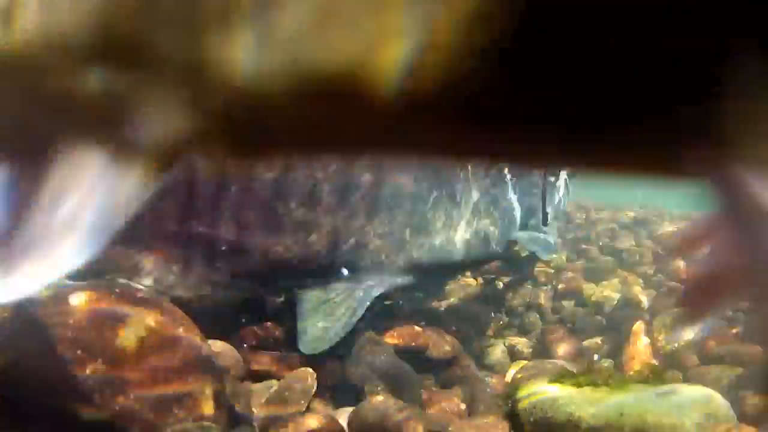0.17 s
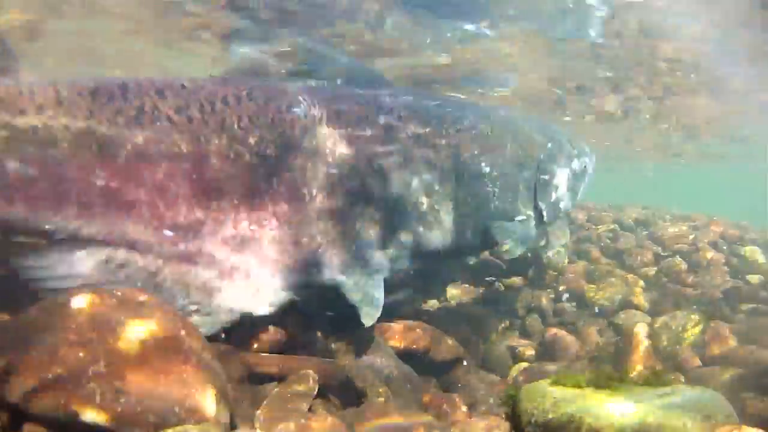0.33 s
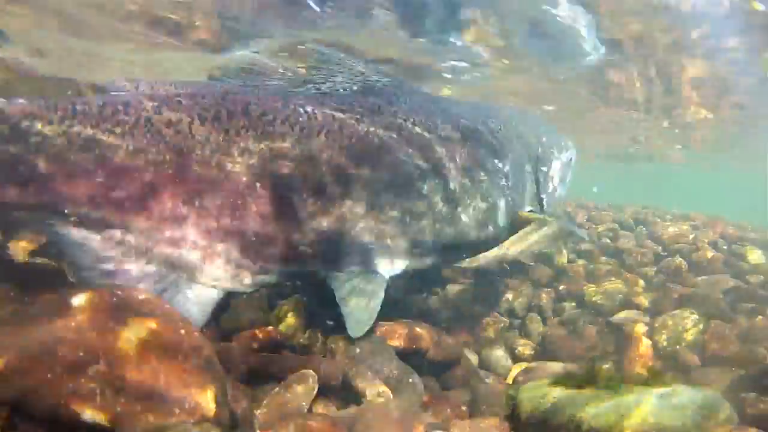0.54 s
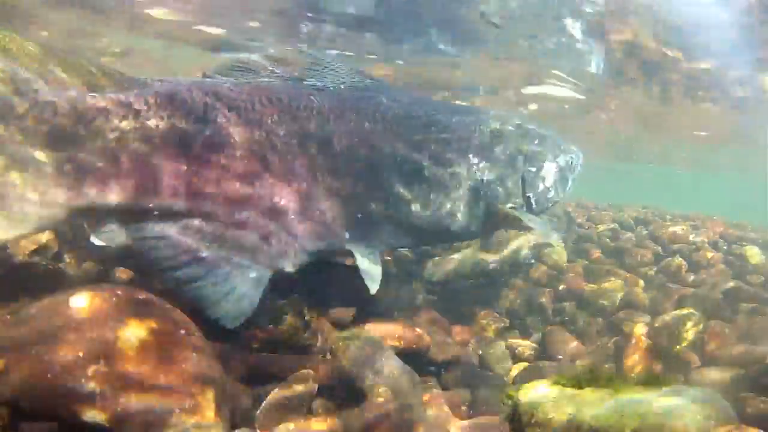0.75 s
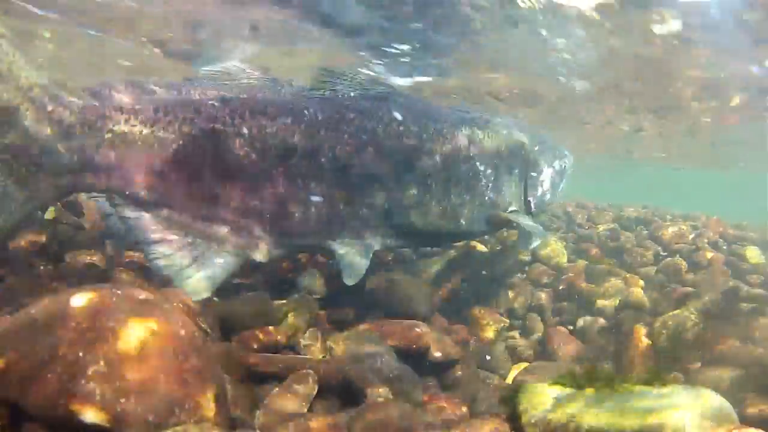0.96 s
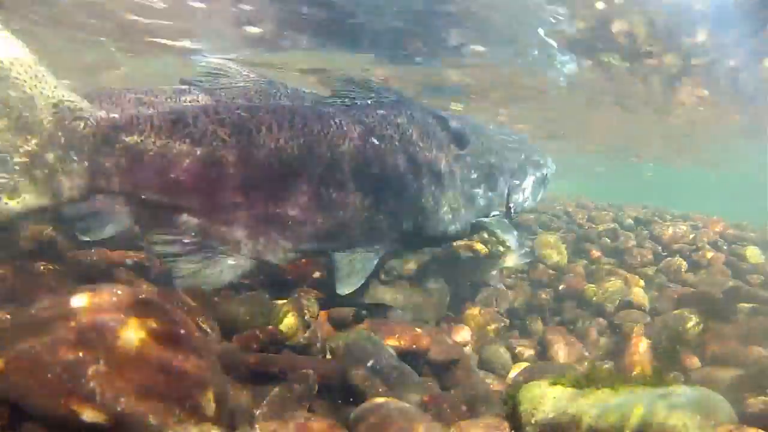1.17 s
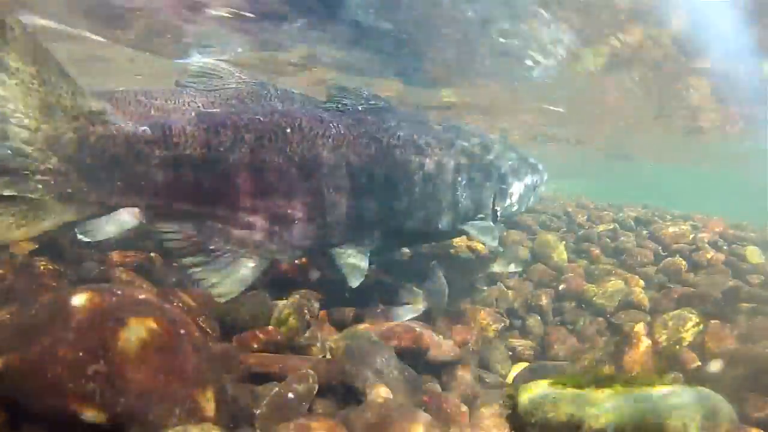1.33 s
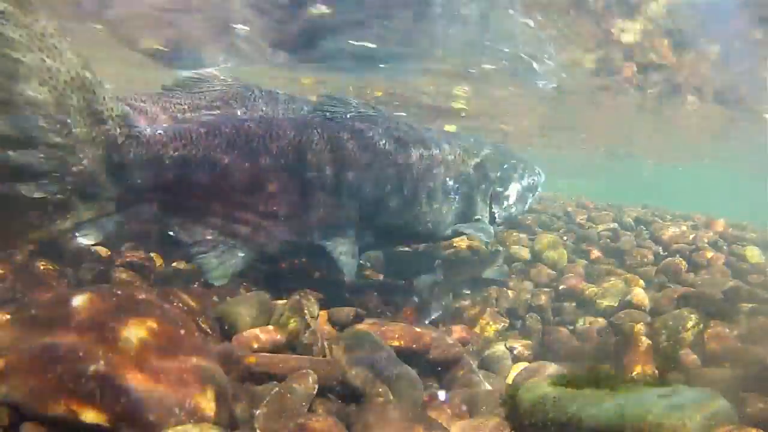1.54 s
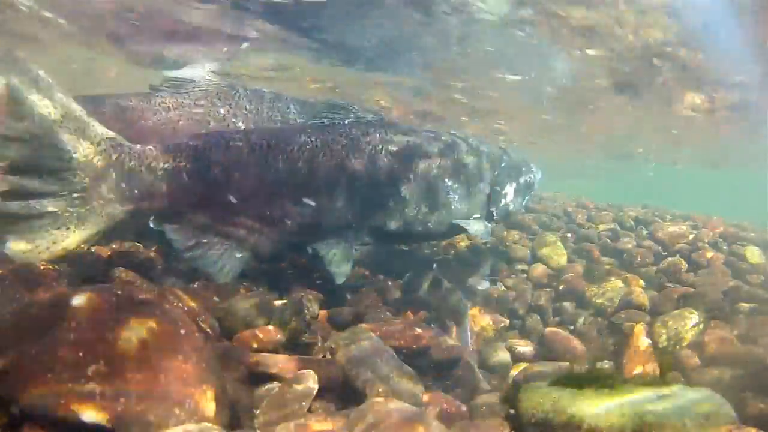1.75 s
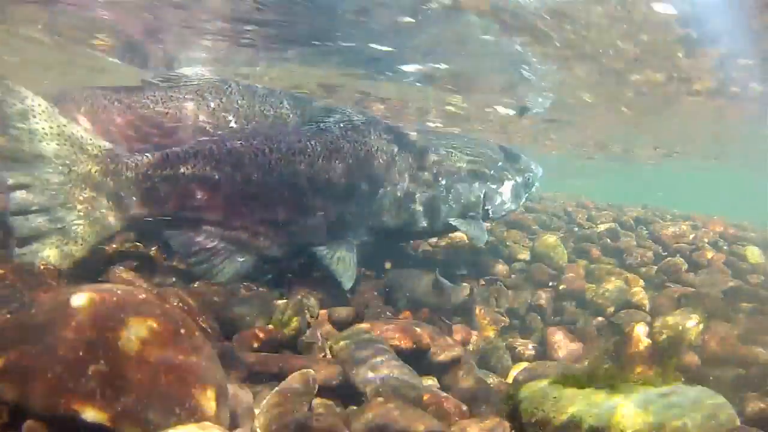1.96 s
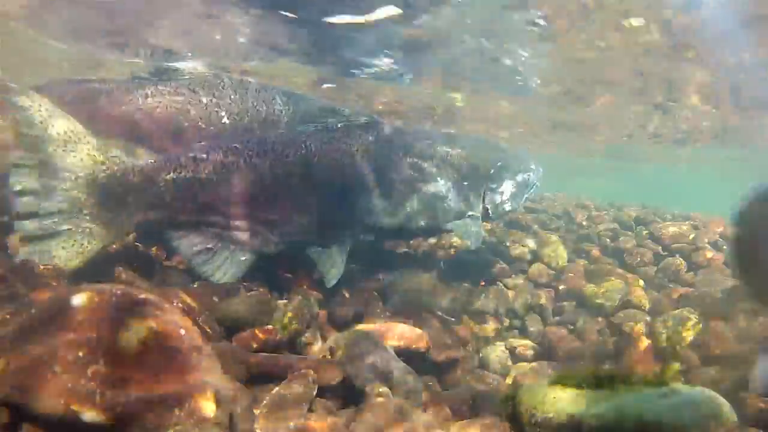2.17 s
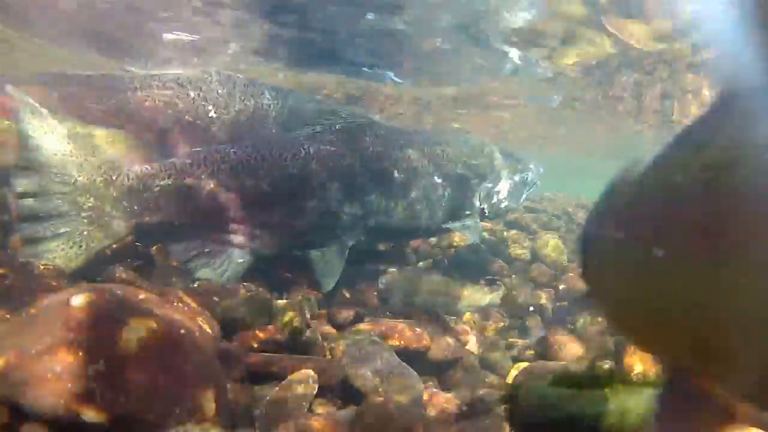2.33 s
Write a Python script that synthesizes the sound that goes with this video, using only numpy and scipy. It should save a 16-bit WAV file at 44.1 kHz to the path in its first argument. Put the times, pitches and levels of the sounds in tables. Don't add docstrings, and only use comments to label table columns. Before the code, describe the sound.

Fish shove a small underwater case with heavy muffled thuds and a gravel crack, over faint stream gurgle.

```python
import sys
import numpy as np
from scipy import signal
from scipy.fft import rfft, irfft, next_fast_len
from scipy.io import wavfile
from scipy.ndimage import map_coordinates

SR = 44100
rng = np.random.default_rng(int(sys.argv[2]) if len(sys.argv) > 2 else 0)


def dump(signal):
    limited = np.clip(np.atleast_2d(signal).T, -1, 1)
    pcm = np.round(limited * 32767).astype(np.int16)
    wavfile.write(sys.argv[1], SR, pcm)


def attenuation_scalar(level_db):
    decades = np.asarray(level_db, float) / 20
    return 10 ** decades


N = 105840

# [t/s, level/dB]
STIR = [(0, -37.5), (.1, -31.5), (.26, -37.5), (0.411, -36.5), (.55, -39.5), (.75, -33.5), (.88, -42),
        (1.02, -43), (1.199, -42), (1.362, -46), (1.439, -53.5), (1.62, -45.5), (1.779, -35.5),
        (1.878, -44.5), (1.96, -42), (2.19, -26.5), (2.28, -44), (2.4, -35.5)]
# [f/Hz, level/dB]
WASH = [(15, -55), (25, -29), (98, 3), (138, -11), (198, -4.5), (310, -16), (366, -23.5), (900, -34.5),
        (1170, -71.5), (1980, -120)]
# [f/Hz, level/dB]
RUMBLE = [(12, -6), (30, 5.5), (55, 3.5), (90, -20)]
# [f/Hz, width/Hz, level/dB]
CASE_RINGS = [
    (1035, 210, 5),
    (2290, 59, 2.5),
    (2750, 200, -14.5),
    (3400, 120, 3),
]
# [t/s, peak level/dB, f/Hz, time to fall 60 dB/s]
TICKS = [(0.0064, -27.5, 2320, 0.032), (0.0374, -38.5, 2420, 0.043), (0.238, -39.5, 2290, 0.024),
         (0.392, -24.5, 3390, 0.042), (0.411, -15, 2890, 0.018), (0.4349, -19, 2820, 0.018),
         (0.447, -23, 2270, 0.04), (0.4966, -40, 2190, 0.019), (0.5212, -47, 2150, 0.0797),
         (0.5412, -40.5, 3363, 0.036), (0.622, -33, 2520, 0.036), (0.646, -40.5, 2370, 0.053),
         (0.6689, -32.5, 2470, 0.012), (0.6958, -39.5, 2450, 0.018), (0.7108, -26, 2620, 0.014),
         (0.722, -29, 2590, 0.051), (0.7994, -41, 2560, 0.036), (0.825, -33, 2430, 0.014),
         (0.845, -40, 2490, 0.015), (0.8656, -45, 3400, 0.021), (0.9094, -43, 2270, 0.028),
         (0.9645, -39, 2240, 0.031), (1.045, -45, 3420, 0.026), (1.125, -44.5, 2214, 0.024),
         (1.1954, -39, 2303, 0.049), (1.3526, -48, 3400, 0.04), (1.455, -48.5, 2850, 0.028),
         (1.517, -49.5, 3540, 0.024), (1.6123, -43, 2440, 0.01), (1.6666, -56.5, 3440, 0.1011),
         (.303, -9, 2237, 0.035), (0.18, -33, 2225, 0.037), (0.602, -50, 2660, 0.022),
         (.922, -46.5, 2330, .04), (.938, -53, 2200, 0.023), (.953, -49, 2080, 0.029)]
# [t/s, level/dB, length/s, top f/Hz]
BUMPS = [(0.04, -33, 0.015, 500), (0.081, -41, 0.1, 463), (0.114, -18.5, 0.012, 803),
         (0.135, -25.5, 0.011, 600), (.195, -31.5, .01, 1010), (0.643, -55, 0.014, 480),
         (0.77, -42.5, 0.052, 600), (0.903, -46, 0.043, 740), (1.634, -34, 0.0043, 865),
         (1.682, -42, 0.034, 800), (1.696, -41.5, .008, 1290), (1.756, -44.5, 0.064, 625),
         (1.892, -53, 0.0078, 900), (1.907, -31.5, 0.0048, 1250), (1.917, -36.5, 0.0074, 910),
         (2.014, -35.5, 0.028, 785), (2.104, -25, 0.028, 646.6), (2.136, -33, 0.013, 624),
         (2.196, -35, 0.017, 780), (2.29, -34, 0.012, 686), (2.349, -33, 0.0044, 833),
         (2.359, -39, 0.0093, 670)]
# [t of crest/s, level/dB, f/Hz, length/cycles]
SHOVES = [(0.084, -19.5, 252, 1.17), (.129, 8.5, 78.4, 0.39), (.168, -5, 60.6, 0.33),
          (0.188, -11, 66.4, 0.37), (.198, -17, 70, 0.28), (0.211, -13, 131, 0.48), (.29, -15.5, 90, 0.38),
          (0.302, -0.5, 39.6, 0.15), (.335, -10.5, 150, 0.43), (.3395, -6.5, 150, .4),
          (0.348, -11.5, 124, 0.76), (0.3597, -2, 174.3, 0.49), (0.37, -11, 103, 0.47),
          (.386, -17, 108, 0.67), (.585, -21.5, 178, 0.43), (0.742, -22.5, 200, 0.34),
          (0.803, -35, 150, 1.1), (.868, -34, 186, 1.9), (.483, -27, 150, 0.7), (1.692, -24, 205, 1.42),
          (1.778, -26.5, 130, 0.72), (1.797, -27, 168, 1.83), (1.931, -26.5, 195, 1.05),
          (2.021, -20, 69, 0.82), (2.095, -11, 87, 0.46), (2.1131, -3, 97, 0.8), (2.112, -0.5, 192, 0.79),
          (2.129, -13.5, 112, 0.41), (0.248, -27.5, 32, 0.74), (2.14, -11.5, 114.6, 0.51),
          (2.151, -17.5, 150, 0.69), (2.157, -13.5, 198, 0.78)]
# [t of trough/s, level/dB, f/Hz, length/cycles]
PULLS = [(.1185, -1, 40, 0.15), (.139, -3.5, 30, 0.12), (.177, -8.5, 30, 0.12), (.2955, -1.5, 40, 0.059),
         (.315, -6.5, 100, 0.13), (.331, -10.5, 110, 0.51), (.343, -16.5, 130, 0.24),
         (.356, -12.5, 60, 0.43), (.793, -26, 150, .6), (2.146, -11.5, 80, .3), (2.29, -19.5, 200, 0.47)]
# [t/s, length/s, level/dB, tilt/dB
SCRAPES = [(0.113, 0.017, -26, -6.5), (0.176, 0.013, -35, -9), (0.285, 0.018, -20.5, -3.5),
           (0.2934, 0.0065, -12, -1.5), (0.3, 0.005, -9.5, -1), (1.654, 1, -71, 26),
           (0.154, 0.021, -40.5, -13), (0.34, 0.0012, -19, -7), (.347, 0.022, -28, -13.5),
           (0.536, 0.0044, -44, -5), (0.716, 0.016, -44.5, -1), (0.919, 0.029, -53, -8),
           (0.19, 0.0067, -34.5, -9), (0.372, 0.0065, -41.5, -14), (2.014, 0.015, -41, -3.5),
           (2.102, 0.0049, -27, 4), (2.126, 0.0044, -34, -6.5)]
# [t/s, peak level/dB, brightest f/Hz]
CLICKS = [(0.2958, -6, 1694), (0.2963, -2, 2220), (0.3412, -32, 2210), (0.5376, -39.5, 3390),
          (0.5687, -48, 3390), (0.8961, -52.5, 2180), (0.9207, -44, 2440), (0.9652, -39.5, 2100),
          (1.0946, -47.5, 2300), (1.2534, -60.5, 2730), (1.328, -52.5, 3480), (1.3534, -44.5, 3400),
          (1.6368, -50, 2060), (1.6672, -46, 3290), (1.7504, -58, 2350), (1.7544, -54.5, 3520),
          (1.8092, -32.5, 3370), (1.851, -29, 2050), (1.8666, -26, 3500), (1.8951, -47, 3420),
          (1.9094, -45, 2380), (1.932, -44, 3440), (1.949, -47, 3470), (1.9778, -41.5, 3350),
          (1.9899, -38, 3460), (2.0047, -38.5, 2960), (2.0514, -37.5, 2140), (2.1021, -27.5, 2750),
          (2.155, -38, 3120), (2.1654, -44, 3430), (2.1802, -50, 3470), (2.1982, -46, 1750),
          (2.2268, -58, 2350), (2.2586, -50, 3470), (2.2804, -56, 3460), (2.3457, -51.5, 3220),
          (2.3503, -52.5, 2690)]
# [t/s, level/dB, f/Hz, time to fall 60 dB/s]
BUBBLES = [
    (.722, -31, 1010, 0.065),
    (0.9648, -40, 1560, 0.04),
    (.966, -42, 3360, .025),
    (.728, -37, 2650, 0.03),
    (0.788, -47, 1000, 0.02),
]

EDDY_RATE, EDDY_HZ, EDDY_SPREAD, EDDY_CYCLES, EDDY_SIZE_DB = 130, 150, 0.34, 2.59, 5.5
EDDY_DB, WASH_DB, RUMBLE_DB = 0, -2.5, -12.5
RUMBLE_GROWS, HISS_GROWS = 0.53, 0.47
HISS_DB, HISS_FLAT = -63.5, 0.96
PATTER_RATE, PATTER_DB, PATTER_SIZE_DB, PATTER_SCATTER, PATTER_T60_S = 56, -5.5, 6.5, 0.1, 0.025
TICK_ROUGH, TICK_ROUGH_S = 1, 0.0024
TICK_CRACK, CRACK_T60_S = 0.37, 0.012
BUMP_KICK, BUMP_T60_S, BUMP_LOW_HZ = 1.74, 0.033, 150
SHOVE_TAIL = 1.187
SCRAPE_RISE_S, SCRAPE_T60_S, SCRAPE_GRIT_DB = 0.0031, 0.0082, 6
SCRAPE_TAIL = 3.44
CLICK_DB, CLICK_RISE_S, CLICK_HOLD_S, CLICK_T60_S = -4.5, 0.00068, 0.0017, 0.02
CLICK_LOW_HZ, CLICK_WIDTH_HZ, CLICK_PEAK = 1157, 800, 0.8
BUBBLE_SAG, BUBBLE_SAG_S, BUBBLE_HOLD = 0.133, 0.0054, 0.25
SAND_S, SAND_END_S, SAND_RATE, SAND_DB, SAND_SIZE_DB = 1.63, 2.34, 140, -55, 3
SAND_HZ, SAND_PEAK = 3450, 5
RATE_HZ, HOLD = 8000, 6
EDGE_HZ, EDGE_WIDTH_HZ, TOP_HZ, TOP_WIDTH_HZ = 3720, 75, 15300, 150
OVERLOAD, OFFSET = 1, -0.0034


def unit(x):
    return x / np.sqrt(np.mean(x ** 2) + 1e-20)


def along(points, hz):
    f, v = np.transpose(points)
    return np.interp(np.log(hz + 1), np.log(f + 1), v, -120, -120)


def wobble(rate):
    knots = rng.standard_normal(int(N * rate / SR) + 4)
    return map_coordinates(knots, [np.arange(N) * rate / SR])


def filtered(x, response):
    m = next_fast_len(len(x) + 8192)
    return irfft(rfft(x, m) * response(np.fft.rfftfreq(m, 1 / SR)), m)[:len(x)]


def add(track, s, piece):
    part = track[max(round(s * SR), 0):][:len(piece)]
    part += piece[:len(part)]


def gate(t, rise_s, hold_s, t60_s):
    return (1 - np.exp(-t / rise_s)) * attenuation_scalar(-60 * np.maximum(t - hold_s, 0) / t60_s)


def seconds(count):
    return np.arange(count) / SR


def low_cut(f, hz, order):
    return 1 / (1 + (hz / (f + 1)) ** order)


def case(f):
    total = 0
    for k, (centre, width, db) in enumerate(CASE_RINGS):
        total = total + (-1) ** k * attenuation_scalar(db) * 1j * f * width / (centre ** 2 - f * f + 1j * f * width)
    return total


def eddies():
    out, t = np.zeros(N), seconds(SR // 10)
    for at, pitch, size in rng.random((round(EDDY_RATE * N / SR), 3)):
        hz = EDDY_HZ * np.exp(EDDY_SPREAD * (2 * pitch - 1))
        u = t * hz / EDDY_CYCLES
        swell = (u * 4) ** 2 * np.exp(-u * 8)
        level = attenuation_scalar(-EDDY_SIZE_DB * np.log(size + 0.08))
        add(out, at * N / SR, level * np.sin(2 * np.pi * hz * t) * swell)
    return unit(out)


def patter():
    out, t = np.zeros(N), seconds(SR // 25)
    for at, which, off, size in rng.random((round(PATTER_RATE * N / SR), 4)):
        hz = CASE_RINGS[int(which * len(CASE_RINGS))][0] * (1 + PATTER_SCATTER * (2 * off - 1))
        level = attenuation_scalar(-PATTER_SIZE_DB * np.log(size + 0.19))
        add(out, at * N / SR, level * np.sin(2 * np.pi * hz * t) * gate(t, 0.00028, 0.001, PATTER_T60_S))
    return unit(out)


def hiss():
    noise = rng.standard_normal(N) * attenuation_scalar(1.3 * wobble(13) + 2.3 * wobble(150))
    colour = lambda f: (HISS_FLAT + abs(case(f)) ** 2) * (f < RATE_HZ / 2)
    return unit(filtered(noise, colour)) + attenuation_scalar(PATTER_DB) * patter()


def flow(points):
    return unit(filtered(rng.standard_normal(N), lambda f: attenuation_scalar(along(points, f))))


def water():
    s, level = np.transpose(STIR)
    stir = np.interp(seconds(N), s, level - level.mean())
    low = attenuation_scalar(EDDY_DB + stir) * eddies()
    low += attenuation_scalar(WASH_DB + stir + 2 * wobble(20)) * flow(WASH)
    low += attenuation_scalar(RUMBLE_DB + RUMBLE_GROWS * stir + 3.5 * wobble(3.5)) * flow(RUMBLE)
    return attenuation_scalar(level.mean()) * low + attenuation_scalar(HISS_DB + HISS_GROWS * stir + 1.6 * wobble(4)) * hiss()


def ticks():
    out, cracks, t = np.zeros(N), np.zeros(N), seconds(SR // 8)
    for s, db, hz, t60 in TICKS:
        drift = TICK_ROUGH * np.cumsum(rng.standard_normal(len(t))) / np.sqrt(TICK_ROUGH_S * SR)
        add(out, s, attenuation_scalar(db) * np.sin(2 * np.pi * hz * t + drift) * gate(t, 0.00063, 0.00053, t60))
        add(cracks, s, attenuation_scalar(db - 60 * t / CRACK_T60_S) * rng.standard_normal(len(t)))
    return out + TICK_CRACK * filtered(cracks, lambda f: (1 + 2.2 * case(f)) * low_cut(f, 1600, 4))


def bumps():
    out, t = np.zeros(N), seconds(SR // 6)
    for s, db, length, top_hz in BUMPS:
        muffle = lambda f: low_cut(f, BUMP_LOW_HZ, 4) / (1 + (f / top_hz) ** 6) / (f + 180)
        puff = unit(filtered(rng.standard_normal(len(t)), muffle))
        kick = -np.sin(np.pi * top_hz * t) * np.exp(-t * top_hz * 2.26) * (1 - np.exp(-t / 0.00068))
        add(out, s, attenuation_scalar(db) * (puff * gate(t, 1 / top_hz, length, BUMP_T60_S) + BUMP_KICK * kick))
    return out


def swings(rows):
    out, t = np.zeros(N), seconds(N)
    for s, db, hz, cycles in rows:
        stretch = np.where(t > s, SHOVE_TAIL, 1)
        out += attenuation_scalar(db) * np.cos(2 * np.pi * hz * (t - s)) * np.exp(-((t - s) * hz / cycles / stretch) ** 2)
    return out


def shoves():
    return swings(SHOVES) - swings(PULLS)


def scrapes():
    out, t = np.zeros(N), seconds(SR)
    for s, length, db, tilt in SCRAPES:
        grains = np.repeat(rng.standard_normal(len(t) // 40 + 1), 40)[:len(t)]
        grit = rng.standard_normal(len(t)) * attenuation_scalar(SCRAPE_GRIT_DB * grains)
        body = lambda f: (0.42 + case(f) * (f > 1500)) * (f < RATE_HZ / 2)
        colour = lambda f: body(f) * attenuation_scalar(tilt * np.log2((f + 50) / 2000)) * low_cut(f, 350, 4)
        shape = gate(t, SCRAPE_RISE_S, length, SCRAPE_T60_S + SCRAPE_TAIL * length)
        add(out, s, attenuation_scalar(db) * unit(filtered(grit, colour)) * shape)
    return out


def crack(db, hz, peak):
    t = seconds(SR // 30)
    ring = lambda f: 1j * f * CLICK_WIDTH_HZ / (hz * hz - f * f + 1j * f * CLICK_WIDTH_HZ)
    colour = lambda f: (1 + peak * ring(f)) * (f < RATE_HZ / 2) * low_cut(f, CLICK_LOW_HZ, 6)
    noise = unit(filtered(rng.standard_normal(len(t)), colour))
    return attenuation_scalar(db + CLICK_DB) * noise * gate(t, CLICK_RISE_S, CLICK_HOLD_S, CLICK_T60_S)


def clicks():
    out = np.zeros(N)
    for s, db, hz in CLICKS:
        add(out, s, crack(db, hz, CLICK_PEAK))
    return out


def bubbles():
    out, t = np.zeros(N), seconds(SR // 8)
    for s, db, hz, t60 in BUBBLES:
        bent = t - BUBBLE_SAG * BUBBLE_SAG_S * np.exp(-t / BUBBLE_SAG_S)
        add(out, s, attenuation_scalar(db) * np.sin(2 * np.pi * hz * bent) * gate(t, 0.0024, BUBBLE_HOLD * t60, t60))
    return out


def sand():
    out, span = np.zeros(N), SAND_END_S - SAND_S
    for at, size in rng.random((round(SAND_RATE * span), 2)):
        db = SAND_DB - SAND_SIZE_DB * np.log(size + 0.07)
        add(out, SAND_S + at * span, crack(db, SAND_HZ, SAND_PEAK))
    return out


def scene():
    mix = water() + ticks() + bumps() + shoves() + scrapes() + clicks() + bubbles() + sand()
    return mix[None]


def high_cut(x, hz, width_hz):
    return filtered(x, lambda f: 1 / (1 + np.exp(np.minimum((f - hz) / width_hz, 50))))


def band_limit(x):
    return signal.sosfilt(signal.butter(12, 16370, fs=SR, output="sos"), x)


def record(dry):
    x = high_cut(np.clip(dry[0], -OVERLOAD, OVERLOAD), EDGE_HZ, EDGE_WIDTH_HZ)
    x = np.r_[x, x[::-1]]
    slow = signal.resample(x, len(x) * RATE_HZ // SR)
    stairs = np.roll(np.repeat(slow, HOLD), -HOLD // 2)
    held = signal.resample(stairs, len(x))[:N]
    mix = high_cut(held, TOP_HZ, TOP_WIDTH_HZ) + OFFSET
    return band_limit(np.clip(mix, -OVERLOAD, OVERLOAD)[None])


dry = scene()
out = record(dry)
dump(out)
```